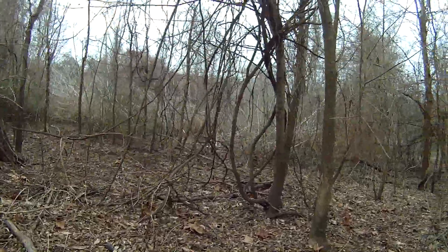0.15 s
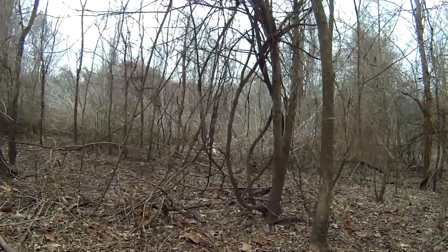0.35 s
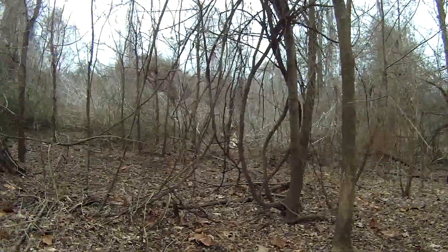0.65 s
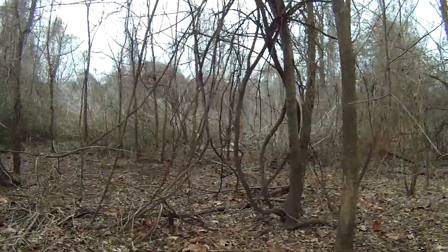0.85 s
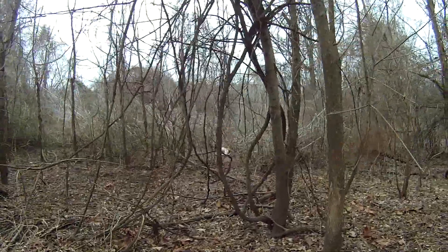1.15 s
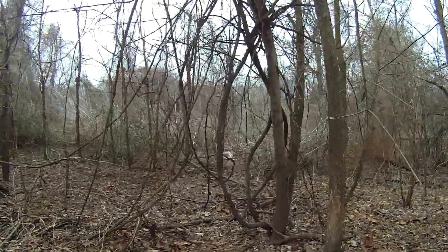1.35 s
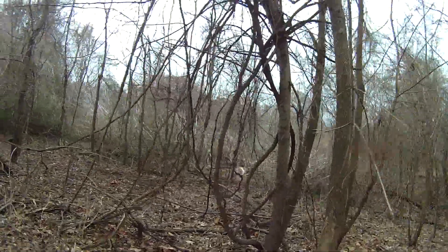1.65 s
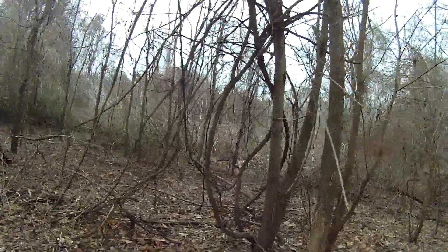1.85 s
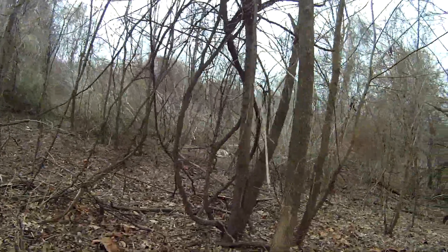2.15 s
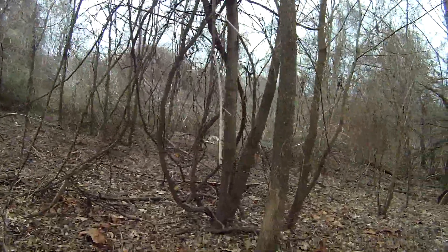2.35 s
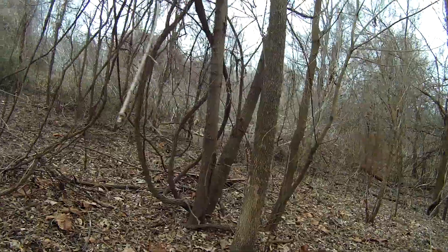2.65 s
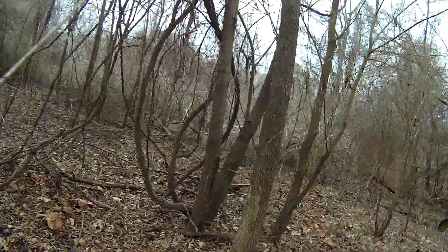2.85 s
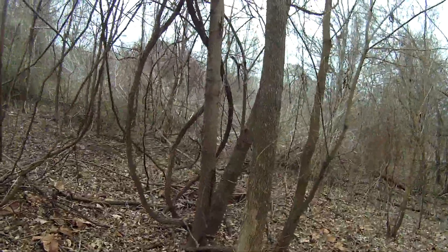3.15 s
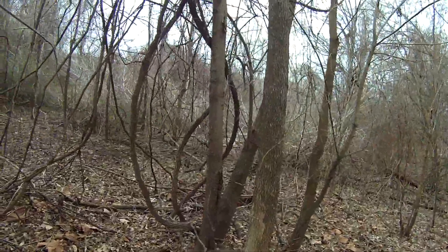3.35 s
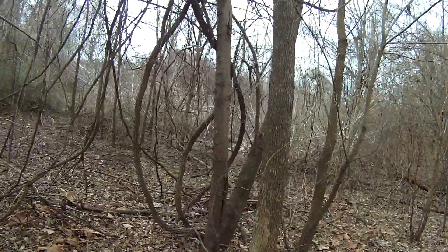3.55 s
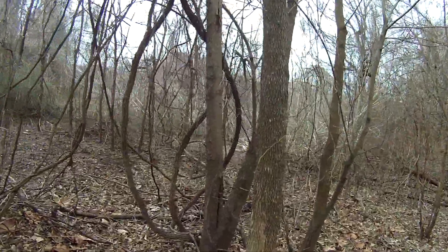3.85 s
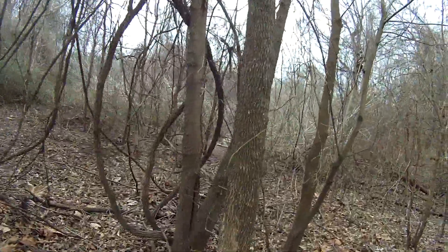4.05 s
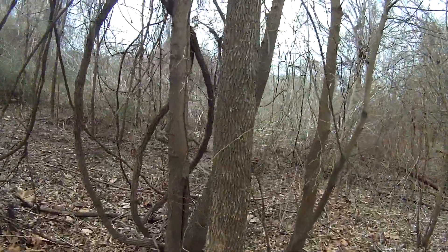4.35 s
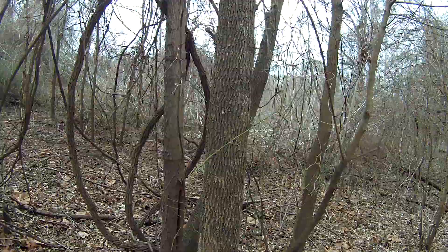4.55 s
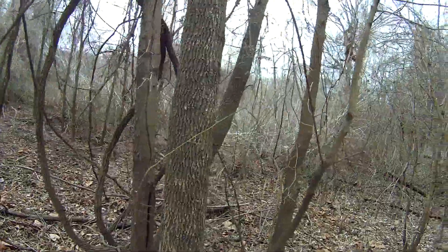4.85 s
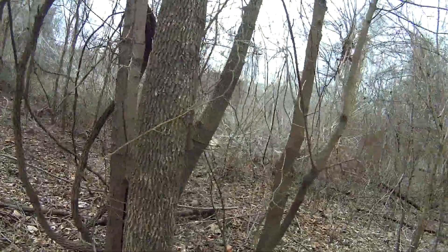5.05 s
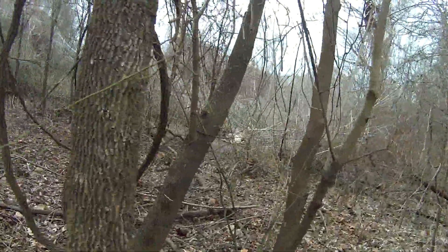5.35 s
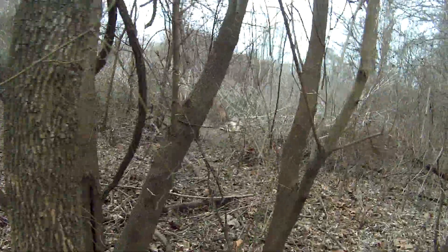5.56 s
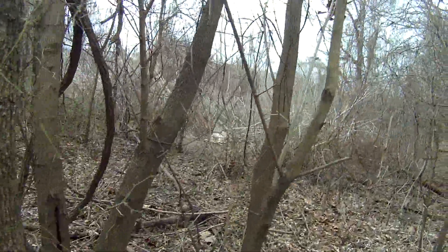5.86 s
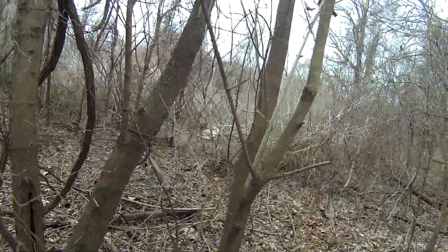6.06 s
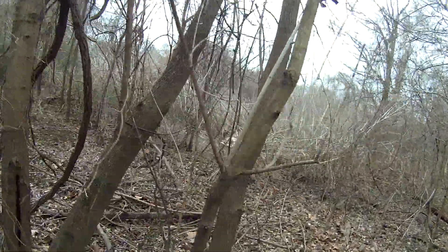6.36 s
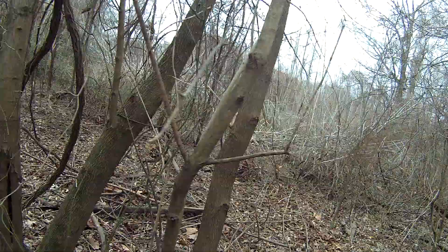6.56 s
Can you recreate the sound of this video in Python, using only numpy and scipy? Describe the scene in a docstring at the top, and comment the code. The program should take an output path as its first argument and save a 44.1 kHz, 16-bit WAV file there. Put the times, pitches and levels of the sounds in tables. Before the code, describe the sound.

One small hand-held microphone, in mono, hears slow footsteps in dry leaf litter among winter trees. From 0 to 1.2 s the crunching is dense and brittle, with dull clods giving way near 0.25 s and bright twig snaps around 0.55 and 0.8 s. A short crunch and low thud come at 1.3 s, a stalk tick at 1.5 s, then sharp ticks lead to the strongest snap and heel thud at 1.95 s. Ticks follow at 2.25 s; a soft sliding rustle spans 2.85 to 3.2 s, then near quiet. Leaves rustle and crackle from 3.95 to 4.35 s, followed by a faint crunch around 4.5 s. Brushing and small cracks return from 5.1 to 5.6 s, as the distant low rumble swells briefly near 5.7 s. A light snap falls at 6 s, then sweeping leaves from 6.3 s end in dull pops, clustered twig cracks and a thud near 6.6 s. Faint hiss stays steady.

```python
"""Crisp, slow footsteps through dry leaf litter, with snapping twigs and low thuds, in winter woods.
Close by, each step crushes brittle leaves, made as clumps of tiny ringing fractures; twigs, stalks
and clods are bursts through resonances, and heels on soft soil are short decaying swings.
Ground and trunks scatter the breaks briefly. Far off lies a low rumble of open air; a faint hiss
stays steady behind. One small hand-held microphone hears it through a port that colours the treble."""
import sys
import numpy as np
from scipy import signal
from scipy.fft import rfft, irfft
from scipy.io import wavfile

SR = 44100
rng = np.random.default_rng(int(sys.argv[2]) if len(sys.argv) > 2 else 0)


def transcribe(u):
    """Save the signal u as a 16-bit wav file named by the first command-line argument.

    u: samples, shape (n,) or (channels, n), limited to [-1, 1]; the rate is SR.
    q: integer samples, one column per channel.
    """
    v = np.clip(np.atleast_2d(u).T, -1, 1)
    q = np.round(v * 32767).astype(np.int16)
    wavfile.write(sys.argv[1], SR, q)


N = 295470  # length in samples

# distant rumble of open air: [f/Hz, relative level per Hz/dB]
RUMBLE_SPECTRUM = [(10, -11), (22, 0), (55, 2.5), (78, -0.5), (110, -11.5), (200, -23), (1000, -51)]
# faint steady background hiss: [f/Hz, relative level per Hz/dB]
HISS_SPECTRUM = [(10, -30), (60, -6), (130, -5.5), (240, -8.5), (400, -9.5), (650, -13), (1100, -16.5),
                 (2400, -22.5), (4700, -28.5), (6000, -27), (7500, -32), (10000, -35.5), (12000, -24.5),
                 (15000, -41)]
# a shoe bearing on the litter or sweeping through it: [start t/s, rise t/s, length until release t/s,
# nominal surface rustle level/dB, nominal deep crushing level/dB, share that breaks, not slides/0-1]
TREADS = [(0, 0.057, 0.3, -48, -45.5, 0.99), (0.171, 0.11, 0.28, -44, -46, 1),
          (0.461, 0.058, 0.19, -40.5, -41, 0.99), (0.678, 0.016, 0.27, -50, -46.5, 0.76),
          (0.972, 0.039, 0.28, -52.5, -56, 1), (1.272, 0.015, 0.03, -39.5, -39, 1),
          (1.477, 0.02, 0.19, -55.5, -55, 0.97), (1.703, 0.06, 0.17, -50.5, -48, 0.8),
          (1.929, 0.015, 0.016, -42.5, -43, 1), (2.22, .015, 0.043, -61.5, -64, .05),
          (2.74, 0.044, .13, -59.5, -58.5, .03), (2.853, 0.069, 0.28, -48, -52, 0),
          (3.183, .02, 0.12, -60.5, -58.5, 0.08), (3.937, .03, 0.061, -47.5, -50, 0.01),
          (4.073, 0.042, 0.11, -47.5, -46, 0.17), (4.219, 0.079, 0.14, -54, -52.5, 1),
          (4.515, 0.029, 0.33, -64, -61, 0.7), (5.123, 0.058, 0.18, -47.5, -47, 0.07),
          (5.343, 0.022, 0.083, -51, -48, 0), (5.417, .04, 0.13, -47, -47, 0.07),
          (5.6, 0.049, .17, -59, -56, 1), (6.276, 0.13, 0.22, -46.5, -44.5, 0.25),
          (6.548, 0.035, .08, -43.5, -47.5, 0.97)]
# lightly swept leaves: [f/Hz, relative level per Hz/dB]
BRUSH_SPECTRUM = [(300, -27), (1500, -30), (3000, -5.5), (4200, -3), (5100, 5.5), (7000, 2.5), (8200, -18),
                  (10500, -14.5), (15000, -19.5)]
# leaves breaking up: [f/Hz, relative level per Hz/dB]
BREAK_SPECTRUM = [(300, -23), (1500, -13), (2200, -0.5), (2850, 2), (3500, 1.5), (4600, 1), (7200, 0.5),
                  (9200, -10), (10800, -15), (15000, -14)]
# packed litter crushed under the shoe: [f/Hz, relative level per Hz/dB]
CRUSH_SPECTRUM = [(30, 7), (120, 8), (300, 2.5), (550, -3.5), (850, 0), (1350, -0.5), (1700, -0.5),
                  (2500, -1), (3800, -9), (6000, 3), (15000, -68)]
# damp sticks and clods giving way under the leaves: [t/s, peak level before scatter/dB, f/Hz]
CLODS = [(.151, -36.5, 1080), (.244, -35, 610), (.256, -32, 915), (1.963, -32, 940), (4.105, -43, 1110),
         (5.51, -31, 920), (6.425, -32.5, 498), (6.451, -34.5, 533), (6.493, -31, 780)]
# heels landing on soft soil: [t/s, peak level of envelope/dB, f/Hz, swell t/s]
HEELS = [(.254, -35, 232, 0.0018), (1.323, -28, 89.5, 0.0062), (1.385, -34.5, 177, 0.00098),
         (1.635, -43, 189, 0.0023), (1.9493, -21.5, 207, 0.0013), (5.988, -40.5, 111, 0.0028),
         (6.588, -32.5, 124, 0.003)]
# single stiff leaves and stalks giving way: [t/s, peak level before scatter/dB]
STALKS = [(.454, -34), (.6404, -36), (.7921, -34), (1.523, -26), (1.8298, -30), (1.858, -25),
          (2.2398, -32.5), (2.266, -37), (2.9352, -37), (3.1276, -34), (3.2202, -35.5), (3.486, -40),
          (4.122, -44), (4.264, -38), (4.3264, -33), (5.2282, -34), (5.3303, -32), (5.4247, -36)]
# twigs breaking, levels before scatter: [t/s, crack level/dB, crack f/Hz, wood level/dB, wood f/Hz,
# knock on the soil level/dB, splitting t/s]
TWIGS = [(0.5402, -30.5, 3120, -66, 2190, -72, 0.0033), (0.601, -35.5, 4160, -41.5, 1720, -47, 0.0059),
         (.813, -33.5, 5440, -41, 970, -46.5, 0.0023), (0.8621, -48, 5070, -51.5, 1720, -49.5, 0.0033),
         (1.0845, -49, 2860, -45, 1390, -53.5, 0.0015), (1.287, -39, 3830, -47.5, 1540, -55, 0.0014),
         (1.494, -53, 3700, -48.5, 1870, -71, 0.00062), (1.6264, -51, 4900, -60, 825, -59, 0.0027),
         (1.9476, -30, 4000, -48, 2200, -42.5, 0.0063), (3.996, -48.5, 5440, -47, 1090, -51, 0.0088),
         (5.254, -45, 4660, -45.5, 1370, -52.5, 0.019), (5.355, -49.5, 4540, -53.5, 1640, -78, 0.0096),
         (5.4531, -43, 5400, -47.5, 1660, -52, 0.0075), (5.4869, -37, 5450, -44.5, 1860, -50.5, 0.0019),
         (5.9898, -43.5, 5400, -52, 1820, -51, 0.0031), (6.38, -47, 5100, -50, 1340, -55, 0.013),
         (6.4814, -46, 4600, -47, 1140, -66, 0.00068), (6.556, -50, 5000, -51.5, 1670, -58, 0.0062),
         (6.5819, -44, 5170, -44.5, 1600, -53.5, .0078), (6.5894, -34, 5450, -37.5, 1340, -47.5, 0.013),
         (6.594, -39.5, 3960, -39, 1350, -41.5, 0.0022)]
# microphone port, with a null, its octave and a falling top: [f/Hz, gain/dB]
PORT_RESPONSE = [(20, 0), (5100, 0), (5600, -5.5), (6020, -16), (6400, -5), (6900, 0), (10000, 0),
                 (11300, -7), (12000, -21), (12700, -6), (14200, 0), (15200, 3), (15550, -18), (16500, -24)]

HISS_DB, HISS_SWELL_DB = -57, -1.16
RUMBLE_START_DB, RUMBLE_SINK_DB_PER_S = -57, 0.5  # the low rumble slowly sinks
SURGE_S, SURGE_WIDTH_S, SURGE_DB = 5.74, 0.24, 9.5  # and swells once
LOAD_GROWTH_DB = 0.5  # the shoe leans on the leaves harder until it stops
RELEASE_DB_PER_S = 127  # the crunch dies once the shoe stops
SETTLE_DB, SETTLE_DB_PER_S = -11, 57  # bent leaves go on creeping back, faintly and for longer
STALK_HZ = 5170
LEAD_S = 0.002  # each burst fades in over this time before its peak
EDGE_HZ = 16500  # upper limit of the treble


def amp(db):
    """Decibels to gain."""
    return 10 ** (np.asarray(db) / 20)


def unit(x):
    """Scales to an rms of 1."""
    return x / np.sqrt(np.mean(x ** 2) + 1e-20)


def read(points, hz):
    """Reads a spectrum along a log-frequency axis."""
    f, db = np.transpose(points)
    return np.interp(np.log(hz + 1), np.log(f + 1), db)


def add(mix, s, sound):
    """Lays a sound into the mix at time s."""
    part = mix[max(round(s * SR), 0):][:len(sound)]
    part += sound[:len(part)]


def colour(x, points, size=4096):
    """Causal (minimum-phase) filter with the given spectrum, so that attacks stay sharp."""
    log_gain = np.log(amp(read(points, abs(np.fft.fftfreq(size, 1 / SR)))))
    taps = np.fft.ifft(np.exp(np.conj(signal.hilbert(log_gain)))).real
    return signal.oaconvolve(x, taps[:size // 2])[:len(x)]


def ring(x, hz, q):
    """One damped resonance, with a q of at least 0.5."""
    return signal.lfilter(*signal.iirpeak(hz, max(q, 0.5), SR), x)


def wander(hz):
    """Smooth chance of rms 1, up to about the given rate."""
    f = np.fft.rfftfreq(N, 1 / SR)
    smooth = rfft(rng.standard_normal(N)) * np.exp(-(f / hz) ** 2)
    return unit(irfft(smooth, N))


def woods(x, t60, wet_db, rise=0.004):
    """Adds scattered sound: sparse echoes that swell quickly and die."""
    t = np.arange(SR // 2) / SR
    echoes = rng.standard_normal(len(t)) * (rng.random(len(t)) < 0.1)
    echoes *= (1 - np.exp(-t / rise)) * amp(-60 * t / t60)
    echoes /= np.linalg.norm(echoes)
    return x + amp(wet_db) * signal.oaconvolve(x, echoes)[:N]


def rumble():
    """Distant low rumble of open air, shaped from noise."""
    t = np.arange(N) / SR
    surge_db = SURGE_DB * np.exp(-((t - SURGE_S) / SURGE_WIDTH_S) ** 2)
    level_db = RUMBLE_START_DB - RUMBLE_SINK_DB_PER_S * t + surge_db
    return amp(level_db) * unit(colour(rng.standard_normal(N), RUMBLE_SPECTRUM))


def hiss():
    """Faint steady background hiss: shaped noise whose level wavers slightly."""
    level_db = HISS_DB + HISS_SWELL_DB * wander(3.2)
    return amp(level_db) * unit(colour(rng.standard_normal(N), HISS_SPECTRUM))


def bearing(start, rise, length):
    """Power of one tread over time: attack, growing weight, release, then the leaves settle."""
    t = np.arange(N) / SR - start
    after = np.maximum(t - length, 0)
    lean_db = LOAD_GROWTH_DB * (np.clip(t / length, 0, 1) - 1.5)
    load = np.clip(t / rise, 0, 1) * amp(lean_db)
    release = amp(-RELEASE_DB_PER_S * after)
    settling = amp(SETTLE_DB - SETTLE_DB_PER_S * after)
    return load ** 2 * (release ** 2 + settling ** 2)


def crackle(per_s, spread_db, clump_db, grain_s, width_hz=5000, count=32):
    """Tiny fractures in clumps; each rings one of many leaves, every leaf with its own broad pitch."""
    size = amp(spread_db * np.minimum(rng.exponential(1, N), 4))
    struck = rng.random(N) < per_s / SR
    clicks = size * rng.choice([-1, 1], N) * struck * amp(clump_db * wander(52))
    leaf = rng.integers(0, count, N)
    t = np.arange(SR // 200) / SR
    out = np.zeros(N)
    for k in range(count):
        hz = (k + 0.5) / count * EDGE_HZ
        buckle = rng.standard_normal(len(t)) * np.exp(-t / grain_s)
        shape = unit(buckle + 2 * ring(buckle, hz, hz / width_hz))
        out += signal.oaconvolve(clicks * (leaf == k), shape)[:N]
    return unit(woods(out, t60=0.1, wet_db=-7))


def litter():
    """Surface leaves slide or break; the packed layer below crunches as the weight comes on."""
    sliding, breaking, crushing = np.zeros((3, N))  # powers
    for start, rise, length, rustle_db, crush_db, broken in TREADS:
        power = bearing(start, rise, length)
        sliding += power * amp(rustle_db) ** 2 * (1 - broken)
        breaking += power * amp(rustle_db) ** 2 * broken
        crushing += power * amp(crush_db) ** 2
    top = crackle(per_s=2600, spread_db=4.8, clump_db=1.2, grain_s=0.00025)
    deep = crackle(per_s=2000, spread_db=1.0, clump_db=3.0, grain_s=0.0013)
    swept = np.sqrt(sliding) * unit(colour(top, BRUSH_SPECTRUM))
    broken_up = np.sqrt(breaking) * unit(colour(top, BREAK_SPECTRUM))
    crushed = np.sqrt(crushing) * unit(colour(deep + 0.5 * top, CRUSH_SPECTRUM))
    return swept + broken_up + crushed


def fracture(split_s, fibres_per_s=7000, fibre_size=0.49):
    """A first break, LEAD_S after the start, then a dying run of tearing fibres."""
    t = np.arange(SR // 30) / SR
    torn = rng.random(len(t)) < fibres_per_s / SR
    burst = fibre_size * rng.standard_normal(len(t)) * torn * np.exp(-t / split_s)
    burst[0] = 1
    spectrum = rfft(np.roll(burst, round(LEAD_S * SR)))
    # equal strength at every frequency leaves the colour to what rings
    even = irfft(spectrum / (abs(spectrum) + 1e-9), len(t))
    fade_in = np.minimum(t / LEAD_S, 1) ** 2
    return even * fade_in * (1 - t / t[-1]) ** 2


def pops(table, q, split_s):
    """Small things buckle with one burst each, ringing at the pitch given for each."""
    out = np.zeros(N)
    for s, db, hz in table:
        pop = ring(ring(fracture(split_s), hz, q), hz, 1.0)
        add(out, s - LEAD_S, amp(db) * pop / abs(pop).max())
    return out


def clods():
    """Damp sticks and clods give way with a dull, heavily damped ring."""
    return pops(CLODS, q=1.1, split_s=0.00083)


def heels():
    """The soil gives under a heel and swings briefly at a low pitch."""
    out = np.zeros(N)
    t = np.arange(SR // 10) / SR
    for s, db, hz, swell_s in HEELS:
        envelope = t / swell_s * np.exp(1 - t / swell_s)
        add(out, s, -amp(db) * envelope * np.sin(2 * np.pi * hz * t))
    return out


def stalks():
    """Stiff leaves and stalks give way singly, as ticks that share one high pitch."""
    return pops([(s, db, STALK_HZ) for s, db in STALKS], q=2, split_s=0.0017)


def twigs():
    """Each break gives a sharp crack, a short ring of the stick and a knock into the ground."""
    out = np.zeros(N)
    for s, crack_db, crack_hz, wood_db, wood_hz, soil_db, split_s in TWIGS:
        burst = fracture(split_s)
        stick = unit(ring(burst, crack_hz, q=5.1))
        splinters = amp(-6) * unit(ring(burst, 7200, q=4.5))
        # the bare fracture reaches the highest treble
        edge = amp(-13) * unit(np.diff(burst, prepend=0))
        # a thin twig radiates little below its own pitch
        thin = signal.butter(2, [0.67 * crack_hz, 9000], "bandpass", fs=SR)
        crack = unit(signal.lfilter(*thin, stick + splinters) + edge)
        wood = unit(ring(ring(fracture(split_s), wood_hz, q=1.6), wood_hz, q=0.5))
        soil = unit(ring(ring(fracture(split_s), 240, q=0.88), 240, q=0.7))
        snap = amp(crack_db) * crack + amp(wood_db) * wood + amp(soil_db) * soil
        add(out, s - LEAD_S, snap)
    return out


def scene():
    """Everything reaches one microphone, the same in both channels."""
    breaks = woods(clods() + stalks() + twigs(), t60=0.16, wet_db=-11.5)
    mono = rumble() + hiss() + litter() + heels() + breaks
    return np.array([mono, mono])


def record(dry):
    """The colour of the microphone port, then the upper limit of the treble."""
    heard = np.array([colour(channel, PORT_RESPONSE) for channel in dry])
    treble_limit = signal.firwin(401, EDGE_HZ, window=("kaiser", 8), fs=SR)
    return signal.oaconvolve(heard, treble_limit[None], "same")


dry = scene()
out = record(dry)
transcribe(out)
```